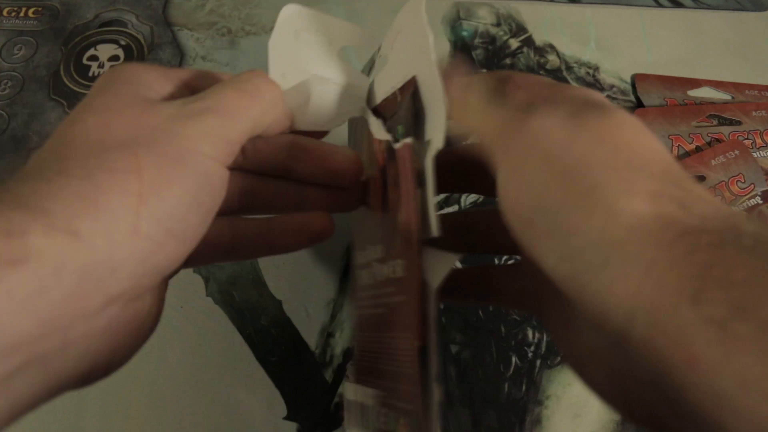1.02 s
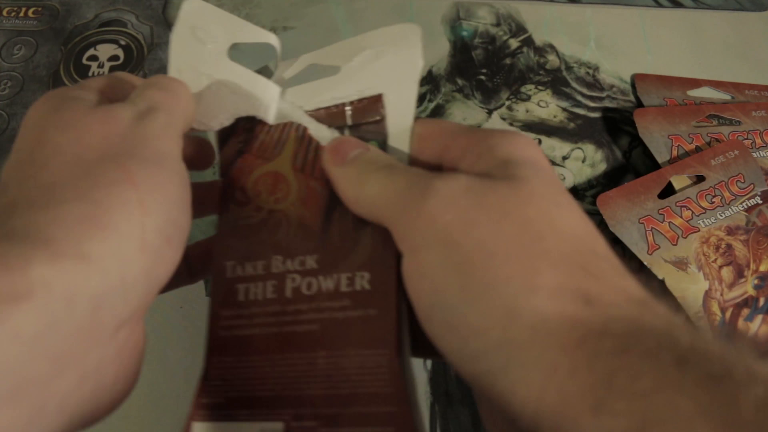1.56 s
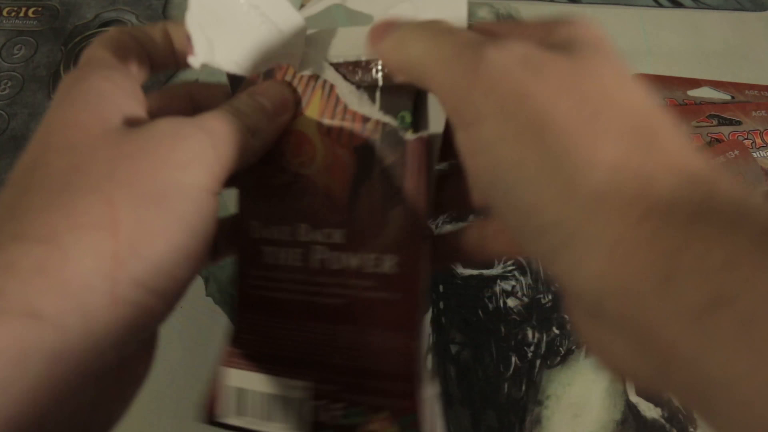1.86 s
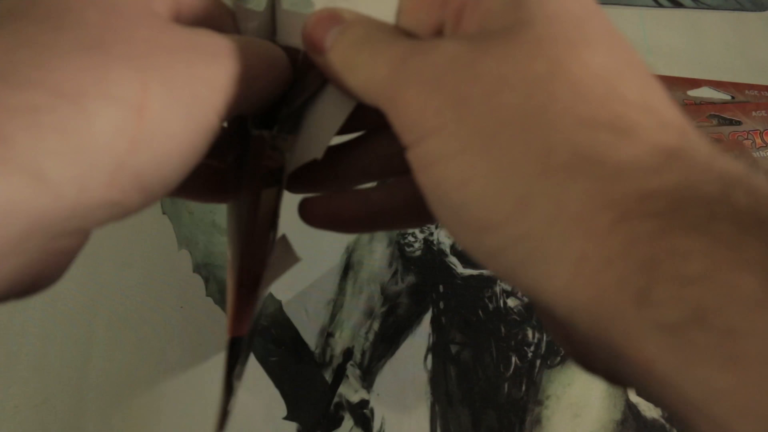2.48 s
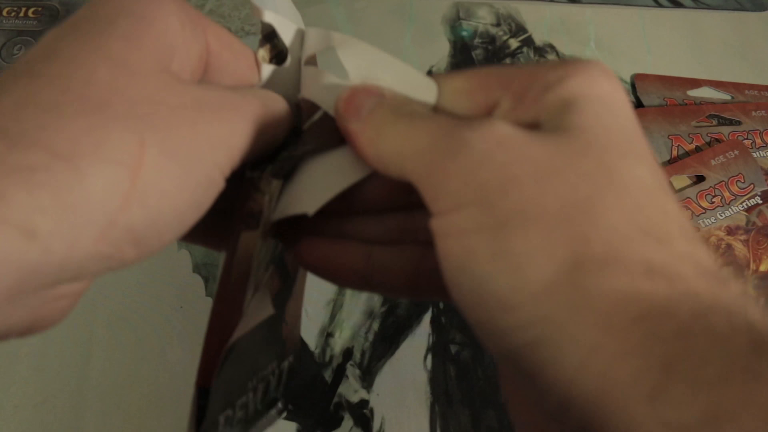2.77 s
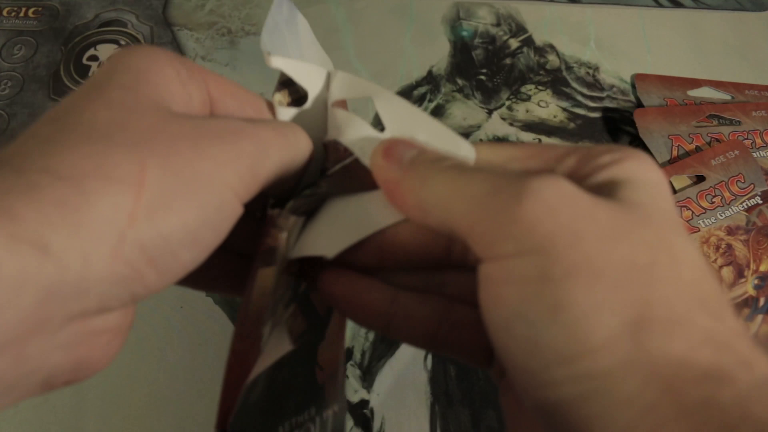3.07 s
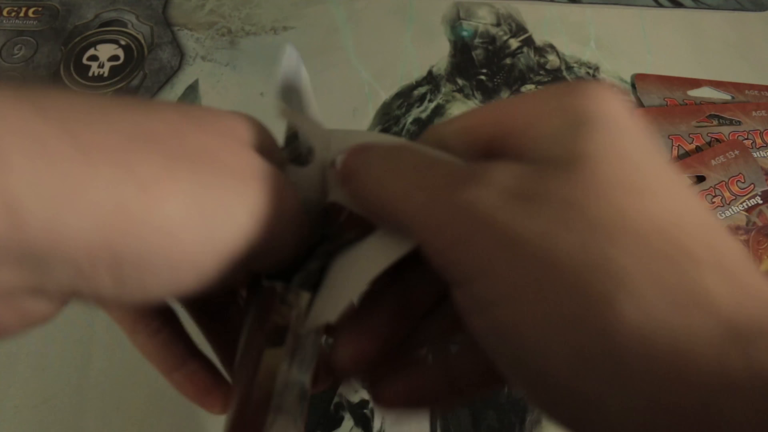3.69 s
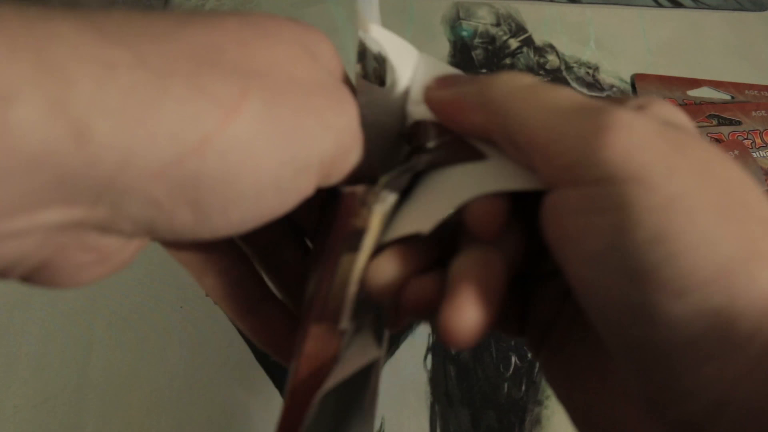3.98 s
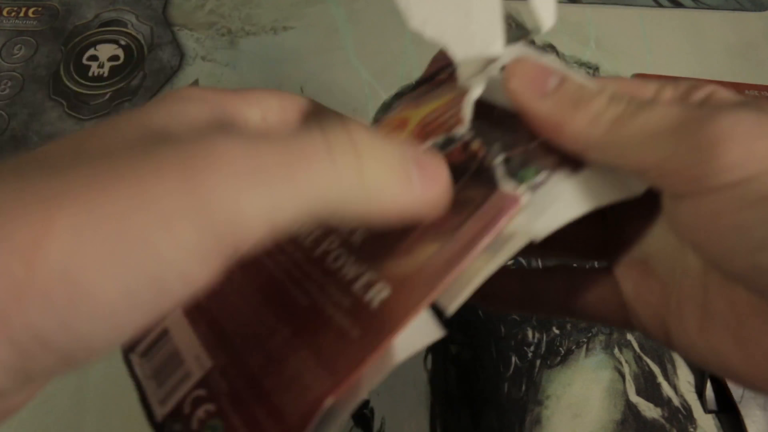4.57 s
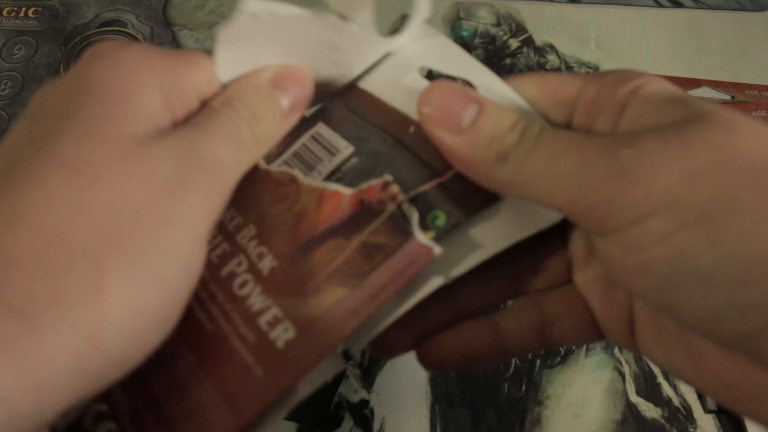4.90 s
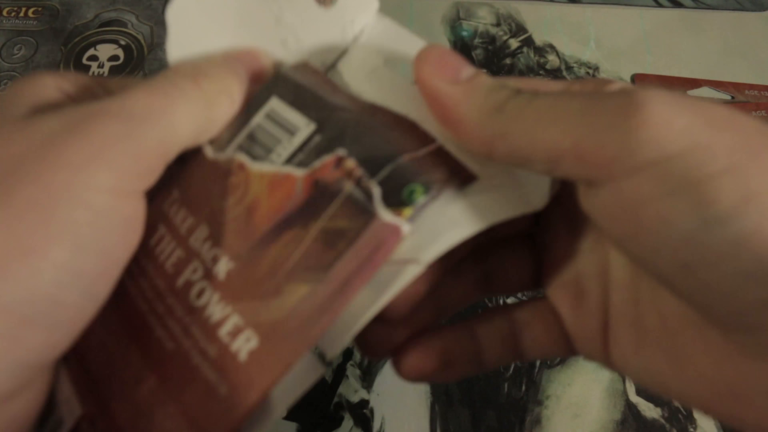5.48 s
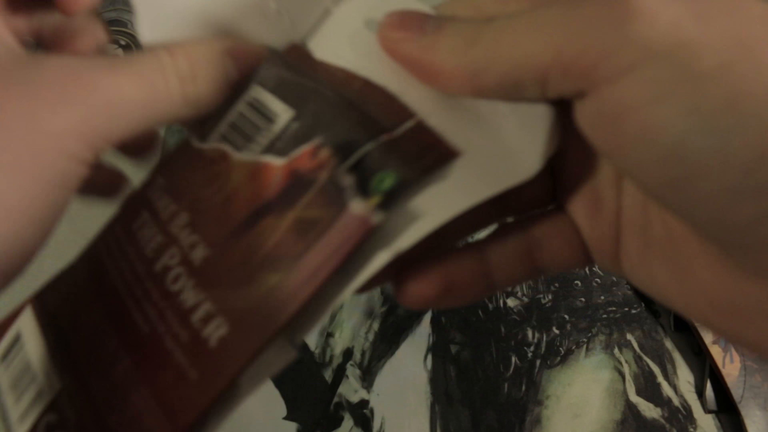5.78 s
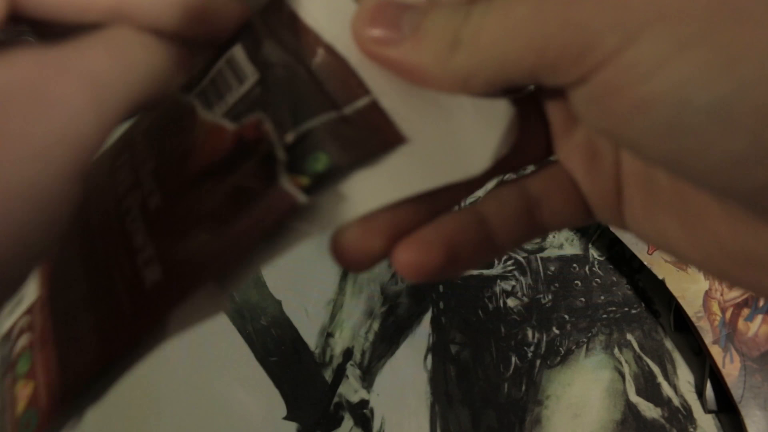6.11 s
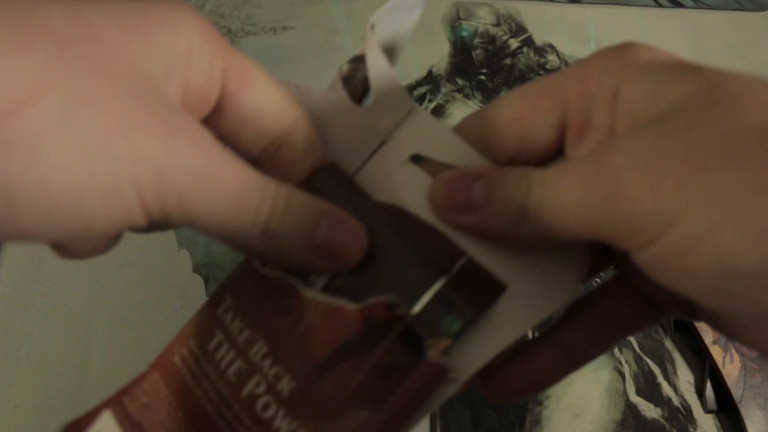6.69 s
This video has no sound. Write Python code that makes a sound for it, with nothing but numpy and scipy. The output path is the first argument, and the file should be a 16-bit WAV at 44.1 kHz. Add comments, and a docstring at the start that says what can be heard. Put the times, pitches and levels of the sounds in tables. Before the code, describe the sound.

Fingers rub and peel open a glued card pack, with small crackles, short rips and one loud crack.

```python
"""Fingers rub and peel card over a faint hiss: a glued pack being opened close to the microphone
in a small, fairly live room. Fibres slip under each short stroke, creases and glue spots snap, and
two flaps rip free, jerking the pack against the palms. The hollow box knocks when bumped, a sliding
flap sings faintly, and late on one seam gives way with a loud crack that sets its panel ringing."""
import sys
import numpy as np
from scipy import signal
from scipy.fft import rfft, irfft, next_fast_len
from scipy.io import wavfile
from scipy.ndimage import map_coordinates

SR = 44100
rng = np.random.default_rng(int(sys.argv[2]) if len(sys.argv) > 2 else 0)


def materialize(psi):
    """Save the field psi as 16-bit PCM at rate SR to the path in sys.argv[1].

    A 1-D psi becomes a single channel; in a 2-D psi each row is a channel.
    """
    bounded = np.clip(np.atleast_2d(psi).T, -1, 1)
    quanta = np.round(bounded * 32767).astype(np.int16)
    wavfile.write(sys.argv[1], SR, quanta)


N = 302075

# the three voices of card (fibres, hollow body, torn edge): f/Hz, spectral level/dB
FIBRE_VOICE = [(500, -40), (1400, -40), (2300, 3), (2800, -4.5), (3400, 2.9), (4100, 1.5), (4900, 3),
               (6300, 1), (7500, -9), (9500, -21), (16000, -32)]
BODY_VOICE = [(100, -29), (300, -14.5), (500, -7.5), (700, 1.5), (1000, -0.5), (1400, 6.5), (1900, 1),
              (3000, -5.5), (6000, -60)]
EDGE_VOICE = [(3000, -53), (6000, 6), (8000, 4.5), (10000, 0), (12000, -0.5), (16000, -19)]


def amp(db):
    """Decibels to gain."""
    return 10 ** (np.asarray(db) / 20)


def unit(x):
    """Scaled to rms 1."""
    return x / np.sqrt(np.mean(x ** 2) + 1e-20)


def along(points, hz):
    """Points (f/Hz, value) read on a log frequency axis."""
    f, values = np.transpose(points)
    return np.interp(np.log(hz + 1), np.log(np.sort(f) + 1), values)


def add(track, s, sound):
    """Mix a sound into a track at s seconds."""
    start = max(round(s * SR), 0)
    part = track[start:start + len(sound)]
    part += sound[:len(part)]


def filtered(x, response):
    """x through a frequency response."""
    size = next_fast_len(N + SR // 4)
    return irfft(rfft(x, size) * response(np.fft.rfftfreq(size, 1 / SR)), size)[..., :N]


def coloured(x, spectrum):
    """x given a spectrum, at rms 1."""
    return unit(filtered(x, lambda hz: amp(along(spectrum, hz))))


def wobble(rate):
    """A smooth random curve, rate knots a second."""
    return map_coordinates(rng.standard_normal(int(N * rate / SR) + 4), [np.arange(N) * rate / SR])


def swell(s, length, attack=0.25, release=0.44):
    """One movement of the hands, swelling and easing over shares of its length."""
    progress = (np.arange(N) / SR - s) / length
    return np.clip(np.minimum(progress / attack, (1 - progress) / release), 0, 1)


def hiss(mid_db=-57, side_db=-62):
    """Steady room tone and recorder noise, in stereo."""
    # noise common to both channels, and differing between them: f/Hz, spectral level/dB
    mid_spectrum = [(12, -18), (20, 7), (142, -1), (388, -6), (825, -5.5), (949, -8), (1960, -11.5),
                    (2460, -10), (4810, -11), (6180, -13), (9140, -14), (14700, -13.5), (16000, -20.5)]
    side_spectrum = [(12, -28), (20, 1), (241, -4.5), (328, -5), (499, -6.5), (759, -7), (1710, -12),
                     (7310, -13), (14700, -11.5), (16000, -60)]
    mid = amp(mid_db) * coloured(rng.standard_normal(N), mid_spectrum)
    side = amp(side_db) * coloured(rng.standard_normal(N), side_spectrum)
    return np.array([mid + side, mid - side])


def fibre_slips(rate, spread_db, scrape):
    """Tiny slips of unequal size at random moments, rate a second, over a smooth scrape."""
    slips = (rng.random(N) < rate / SR) * rng.choice([-1, 1], N)
    sizes = amp(spread_db * np.minimum(rng.standard_normal(N), 1.5))
    return unit(slips * sizes) + scrape * rng.standard_normal(N)


def voice_gains(db, body_db, edge_db):
    """Gains of fibres, body and edge; the last two are set relative to the fibres."""
    return amp([[db], [db + body_db], [db + edge_db]])


def card(slips, gains):
    """Fibre slips heard through the three voices of the card."""
    voices = FIBRE_VOICE, BODY_VOICE, EDGE_VOICE
    return sum(gain * coloured(slips, voice) for gain, voice in zip(gains, voices))


def finger_effort(rest_db=-23):
    """How hard the fingers work the card, as gains of its three voices over time."""
    # the pack shifting in the grip: level/dB, body/relative dB, edge/relative dB
    grip = (-59, -5.5, -10.5)
    # the grip keeps still: t/s, length/s
    rests = [(1.12, 0.07), (1.51, 0.22), (4.31, 0.19)]
    # finger strokes: t/s, length/s, level/dB, body/relative dB, edge/relative dB
    strokes = [(0.317, 0.09, -49.5, -7, 0.5), (0.495, 0.052, -48, 0.5, -5),
               (0.641, 0.22, -42.5, -8.5, -9.5), (0.785, 0.15, -39, -6, -6.5), (1.05, 0.09, -53, -12, -13),
               (1.394, 0.11, -43.5, -7, -5.5), (1.695, 0.073, -51, -6, -8), (2.377, 0.39, -53, -5.5, -3.5),
               (2.63, 0.29, -50.5, -0.5, -26), (2.814, 0.32, -55.5, 6, -19), (3.063, 0.12, -49, -4, -6),
               (3.32, 0.088, -53, 2, -15), (3.52, 0.15, -48.5, -7, -8), (3.722, 0.17, -42.5, -5.5, -9.5),
               (4.03, 0.2, -42.5, -2, -10), (4.748, 0.54, -55.5, -19, -16), (5.114, 0.19, -45, -10.5, -27),
               (5.27, 0.1, -47, -7, -10), (5.933, 0.13, -53, -8, -9), (6.16, 0.19, -50.5, -11, -10.5),
               (6.342, 0.38, -50.5, -8, -5.5), (6.75, 0.08, -49.5, -5.5, -6)]
    stillness = sum(swell(*rest) for rest in rests)
    power = (voice_gains(*grip) * amp(rest_db * stillness)) ** 2
    for s, length, *levels in strokes:
        power += (voice_gains(*levels) * swell(s, length)) ** 2
    return np.sqrt(power)


def rubbing(effort, flutter_db=3.5, trim_db=-6.0):
    """Fingers drag and peel the card, catching and slipping unevenly."""
    slips = fibre_slips(rate=2000, spread_db=7.5, scrape=0.76)
    return card(slips, effort * amp(trim_db + flutter_db * wobble(90)))


def crinkles(effort, typical_db=-39, at_effort_db=-50, growth=0.53, spread_db=1.0,
             low_hz=2300, high_hz=6500, hollow_db=-13, bright_db=-9, count=100):
    """Rows for snapping(): small creases give at random, louder under a harder stroke."""
    when, where, size = rng.random((count, 3)).T
    times = (np.arange(count) + when) / count * (N - 1) / SR
    db, body, edge = 20 * np.log10(effort[:, (times * SR).astype(int)])
    levels = typical_db + growth * (db - at_effort_db) + spread_db * (2 * size - 1)
    pitches = low_hz * (high_hz / low_hz) ** where
    return list(zip(times, levels, pitches, body - db + hollow_db, edge - db + bright_db))


def minimum_phase(gain):
    """The response with this gain that rings only after the blow."""
    cepstrum = irfft(np.log(np.maximum(gain, 1e-6)))
    half = len(cepstrum) // 2
    cepstrum[1:half] *= 2
    cepstrum[half + 1:] = 0
    return np.exp(rfft(cepstrum))


def fracture(envelope, colour, passes=6):
    """A run of breaking fibres, even in spectrum and confined to its envelope, rings through a colour."""
    run = envelope * rng.standard_normal(len(envelope))
    for _ in range(passes):
        whitened = irfft(np.exp(1j * np.angle(rfft(run))))
        run = whitened * np.sqrt(envelope)
    sound = irfft(rfft(run) * minimum_phase(colour))
    return sound / np.linalg.norm(sound) * np.sqrt(np.mean(colour ** 2))


def snapping(small_creases, t60=0.014, crisp_db=-22, softening=0.3, hollow_t60=0.021,
             crumble_db=-20, crumble_t60=0.055, ragged_db=4, ripple_db=3.0, ripple_hz=600,
             patch_db=8.5, patch_octaves=0.34, fibres_db=7.5, body_db=19, edge_db=15,
             bounce_s=0.00063, bounce_gain=0.24, size=2048):
    """Each snap rings its patch of card and the hollow body, crumbles and bounces off a nearby face."""
    # creases and glue spots letting go: t/s, level/dB, patch f/Hz, body/relative dB, edge/relative dB
    snaps = [(0.333, -26, 5750, -26, -3), (0.4198, -34, 2250, -24, -20), (0.5422, -19.5, 3390, -25, -21),
             (0.5521, -15, 4900, -17, -20), (0.5731, -23, 2300, -6.5, -22), (0.8318, -23, 5650, -13, -24),
             (0.8814, -22, 5200, -10.5, -21), (0.9429, -27, 3700, -14, -18),
             (0.98, -27.5, 6260, -15.5, -27), (1.0737, -34.5, 2540, -17, -22),
             (1.2101, -28.5, 6500, -27, -14), (1.2852, -22, 4900, -32, -11),
             (1.2903, -22.5, 4300, -31, -21), (1.295, -19.5, 4700, -31.5, -24),
             (1.3027, -23, 4400, -28, -7), (1.4003, -29.5, 5200, -22, -28), (1.5029, -26.5, 4600, -24, -36),
             (2.241, -37, 2620, -26, -21), (2.3577, -16.5, 4720, -25.5, -34),
             (2.382, -23.5, 5660, -27, -34), (2.4244, -29, 4700, -22, -25), (2.5449, -20.5, 5430, -26, -38),
             (2.628, -24, 3930, -17.5, -28), (2.692, -22.5, 5700, -45, -5.5),
             (2.7207, -25.5, 4580, -11.5, -28), (2.7446, -30.5, 4320, -7.5, -29),
             (2.7732, -28.5, 3400, -12, -12), (2.8447, -27, 6060, -10, -26),
             (2.887, -29.5, 4800, -5.5, -26), (2.9634, -30, 3200, -8, -13),
             (3.0024, -30.5, 4900, -5.5, -15), (3.0785, -24.5, 5740, -11.5, -32),
             (3.0898, -22.5, 6100, -18, -9.5), (3.122, -25.5, 6100, -11, -25),
             (3.1805, -22.5, 3670, -9.5, -18), (3.2983, -33.5, 3430, -19, -15),
             (3.3313, -25.5, 3100, -7.5, -13), (3.5846, -31.5, 2250, -3, -11),
             (3.9479, -29.5, 3580, -22, -8), (4.816, -30, 6140, -22, -30), (5.115, -30.5, 5070, -19, -16),
             (5.1345, -30, 3600, -22, -23), (5.1662, -28, 2700, -18, -26),
             (5.2975, -22.5, 3000, -19.5, -29), (5.5195, -29, 3150, -20, -22),
             (5.6022, -21, 3120, -22, -15.5), (5.8192, -26, 6100, -21, -19), (5.9932, -26, 6300, -17, -7.5),
             (6.006, -29, 5020, -6.5, -10), (6.2545, -32, 5910, -22, -15), (6.406, -32, 3270, -22, -10),
             (6.568, -28.5, 6360, -30, -16), (6.5856, -28, 2900, -30, -4.5),
             (6.8135, -25.5, 2570, -36, -8.5)]
    out, t, hz = np.zeros(N), np.arange(size) / SR, np.fft.rfftfreq(size, 1 / SR)
    broad, hollow, bright = [unit(amp(along(v, hz))) for v in (FIBRE_VOICE, BODY_VOICE, EDGE_VOICE)]
    for s, db, pitch_hz, body, edge in snaps + small_creases:
        # weak creases give way slowly, as scuffs; strong ones go at once
        life = t60 * amp(softening * (crisp_db - db))
        # a few neighbouring fibres follow in a ragged cluster
        cluster_db = ragged_db * map_coordinates(rng.standard_normal(size), [t * 600])
        envelope = amp(-60 * t / life) + amp(crumble_db + cluster_db - 60 * t / crumble_t60)
        patch = unit(np.exp(-0.5 * (np.log2((hz + 1) / pitch_hz) / patch_octaves) ** 2))
        voices = [amp(patch_db) * patch, amp(fibres_db) * broad, amp(edge + edge_db) * bright]
        # the card is bent differently every time, so its small resonances shift
        ripple = unit(amp(ripple_db * map_coordinates(rng.standard_normal(size), [hz / ripple_hz])))
        snap = amp(db) * fracture(envelope, ripple * np.linalg.norm(voices, axis=0))
        body_ring = fracture(amp(-60 * t / hollow_t60), ripple * hollow)
        add(out, s, snap)
        add(out, s + bounce_s, bounce_gain * snap)
        add(out, s, amp(db + body + body_db) * body_ring)
    return out


def ripping(rise_s=0.0022, fall_s=0.0015, flutter_db=0.7):
    """A tear races along the glue: a dense stream of breaks that stops as the flap comes free."""
    # flaps and seams tearing: t/s, length/s, level/dB, body/relative dB, edge/relative dB
    rips = [(0.54, 0.013, -31.5, -3, -9), (0.555, 0.029, -37, -5.5, -12), (4.112, 0.029, -32.5, -3, -11.5),
            (4.143, 0.0267, -32.5, -8, -14.5), (5.377, 0.041, -38, -10, -7)]
    t, gains = np.arange(N) / SR, np.zeros((3, N))
    for s, length, *levels in rips:
        onset = np.clip((t - s) / rise_s, 0, 1)
        release = np.exp(-np.maximum(t - s - length, 0) / fall_s)
        gains += voice_gains(*levels) * onset * release
    breaks = fibre_slips(rate=3500, spread_db=2.0, scrape=0.44)
    return card(breaks, gains * amp(flutter_db * wobble(300)))


def jerking(rise_s=0.0052):
    """When a flap gives, the pack jerks against the palms with a soft thud."""
    # jerks of the pack: t/s, level/dB
    jerks = [(0.572, -60), (0.888, -55), (0.938, -58), (4.159, -44), (5.995, -61)]
    # the thud: f/Hz, spectral level/dB
    thud = [(20, -9), (75, 10.5), (150, -1), (300, -7), (500, 5.5), (900, -16), (2000, -60)]
    gain, age = np.zeros(N), np.arange(SR // 4) / SR / rise_s
    for s, db in jerks:
        add(gain, s, amp(db) * age * np.exp(1 - age))
    return gain * coloured(rng.standard_normal(N), thud)


def knocking(attack_s=0.00054):
    """A soft bump sets the hollow box ringing briefly; neighbouring modes swing in opposite senses."""
    # bumps on the box: t/s, level/dB, pitch ratio set by the grip
    bumps = [(0.883, -20.5, 1.05), (2.904, -33.5, 1.03), (3.520, -38, 1.07), (5.332, -36.5, 1.13),
             (5.9925, -23.5, 0.97), (6.006, -39, 1.04), (6.100, -42.5, 1.2), (6.781, -40.5, 1.14)]
    # modes of the box: f/Hz, level/dB, t60/s
    box_modes = [(372, -18.5, 0.023), (573, -6.5, 0.02), (694, 0, 0.021), (860, -8.5, 0.017),
                 (1220, -16, 0.017), (1420, -12, 0.018)]
    out, t = np.zeros(N), np.arange(SR // 8) / SR
    for s, db, ratio in bumps:
        ring = sum((-1) ** k * amp(level - 60 * t / t60) * np.sin(2 * np.pi * ratio * hz * t)
                   for k, (hz, level, t60) in enumerate(box_modes))
        add(out, s, amp(db) * ring * (1 - np.exp(-t / attack_s)))
    return out


def singing():
    """Fibre slips under a sliding flap keep one narrow resonance going."""
    # slides of a flap: t/s, length/s, f/Hz, width/Hz, level/dB
    slides = [(3.538, 0.16, 1380, 90, -55.5), (4.62, 0.56, 3560, 110, -64.5)]
    out, slips = np.zeros(N), fibre_slips(rate=1800, spread_db=2.0, scrape=0.75)
    for s, length, hz, width, db in slides:
        resonance = unit(filtered(slips, lambda f: 1 / (1 + 2j * (f - hz) / width)))
        out += amp(db) * swell(s, length) * resonance
    return out


def cracking(band_hz=(600, 13000), ceiling=0.71, size=4096):
    """The whole seam lets go within three milliseconds and slaps the panel into ringing."""
    # the glued seam bursting: t/s, length/s, level/dB
    bursts = [(5.3734, 0.0029, -8)]
    # modes of the stiff panel it is glued to: f/Hz, width/Hz, level/dB
    panel = [(638, 77, -9), (1495, 350, -9), (2230, 420, -4), (3210, 310, 2), (4910, 850, 0),
             (6070, 2500, -8), (11700, 2500, -25)]
    out, t, hz = np.zeros(N), np.arange(size) / SR, np.fft.rfftfreq(size, 1 / SR)
    modes = [amp(db) / (1 + (2 * (hz - centre) / width) ** 2) ** 0.77 for centre, width, db in panel]
    colour = unit(np.linalg.norm(modes, axis=0))
    for s, length, db in bursts:
        envelope = np.exp(-(t / length) ** 8)
        add(out, s, amp(db) * np.sqrt(length * SR) * fracture(envelope, colour))
    # the crack's loudest peaks are softly limited, then band-passed
    limited = out / (1 + (out / ceiling) ** 4) ** 0.25
    band = signal.butter(3, band_hz, "bandpass", fs=SR, output="sos")
    return signal.sosfilt(band, limited)


def room(x, wet_db, build_s=0.0083, gap_s=0.004, blocks=20):
    """Near surfaces answer first, then a diffuse tail that changes as the hands move."""
    # echoes off surfaces near the microphone: delay/s, gain
    echoes = [(.0055, 0.23), (.0087, 0.26), (0.0118, .13)]
    # colour of the tail: f/Hz, level/dB
    colour = [(200, 0.5), (650, 0), (1000, 4.5), (1500, -0.5), (3000, 0.5), (6000, -0.5), (12000, 0.5)]
    # decay of the tail: f/Hz, t60/s
    decay = [(200, 0.6), (700, 0.26), (2000, 0.49), (5000, 0.44), (9000, 0.38), (15000, 0.44)]
    # things nearby ringing in sympathy: f/Hz, level/dB, t60/s
    objects = [(682, -54, 0.19), (1361, -44, 0.12), (1616, -48.5, 0.22), (2270, -47, 0.12),
               (3285, -54, 0.087), (4390, -51, 0.24), (4705, -50, 0.14), (4830, -67, 0.17),
               (6120, -45, 0.13)]
    out = x.copy()
    for delay, gain in echoes:
        add(out, delay, gain * x)
    block = N // blocks + 1
    for start in range(0, N, block):
        hz, frames, noise = signal.stft(rng.standard_normal(SR // 2), SR, nperseg=256)
        fading = amp(along(colour, hz)[:, None] - 60 * frames / along(decay, hz)[:, None])
        tail = signal.istft(noise * fading, SR, nperseg=256)[1]
        t = np.arange(len(tail)) / SR
        tail *= 1 - np.exp(-t / build_s)
        rings = sum(amp(db - 60 * t / t60) * np.sin(2 * np.pi * (f * t + rng.random()))
                    for f, db, t60 in objects)
        response = tail / np.linalg.norm(tail) + rings
        add(out, start / SR + gap_s, amp(wet_db) * signal.fftconvolve(x[start:start + block], response))
    return out


def scene():
    """All the handling is close up and straight in front of the microphone."""
    effort = finger_effort()
    handling = room(rubbing(effort) + singing() + ripping() + jerking(), wet_db=-4.5)
    snaps = room(snapping(crinkles(effort)), wet_db=-6.5)
    knocks = room(knocking(), wet_db=-6.5)
    crack = room(cracking(), wet_db=-9.0)
    return handling + snaps + knocks + crack + hiss()


def record(dry):
    """The recorder keeps nothing above 16.2 kHz."""
    return filtered(dry, lambda hz: hz < 16200)


dry = scene()
out = record(dry)
materialize(out)
```